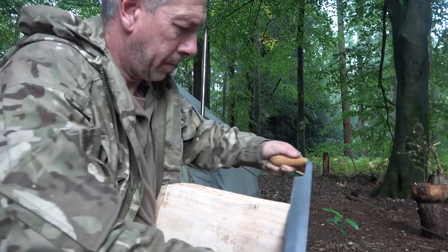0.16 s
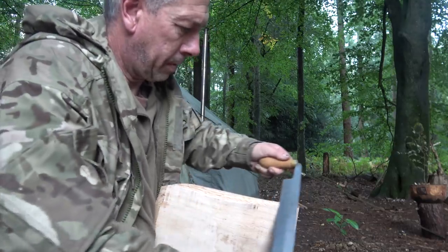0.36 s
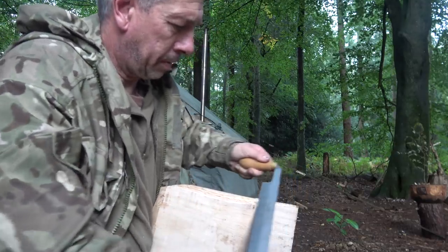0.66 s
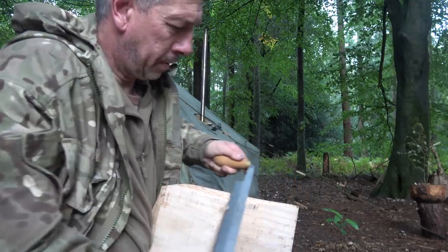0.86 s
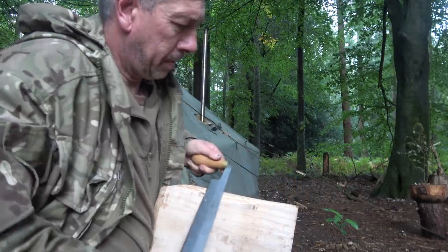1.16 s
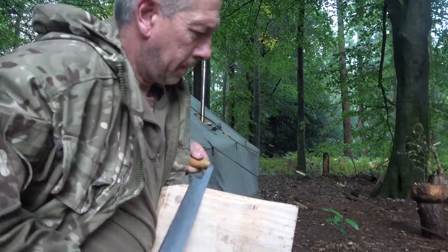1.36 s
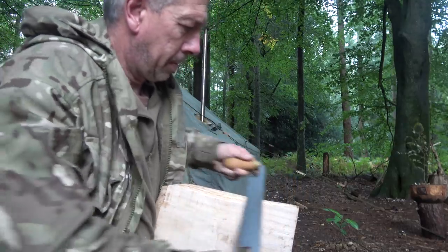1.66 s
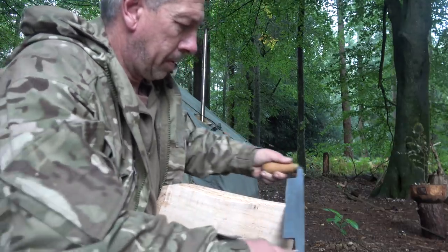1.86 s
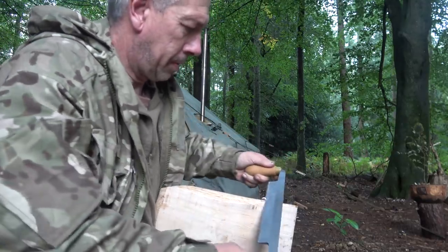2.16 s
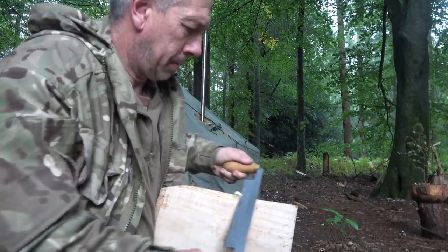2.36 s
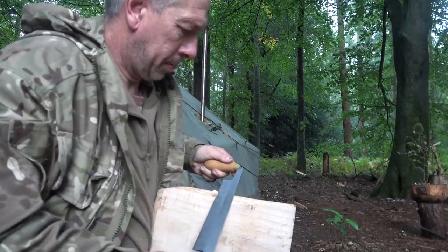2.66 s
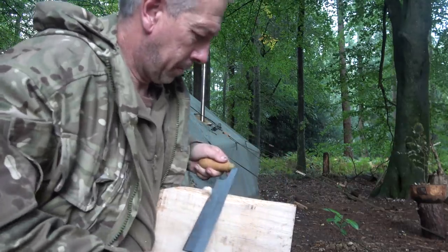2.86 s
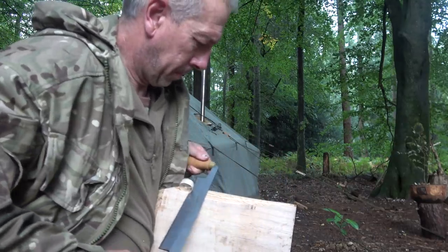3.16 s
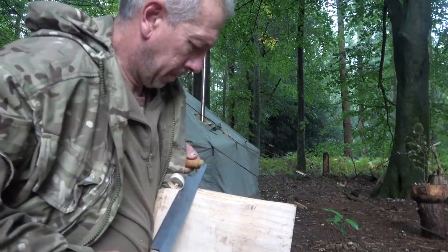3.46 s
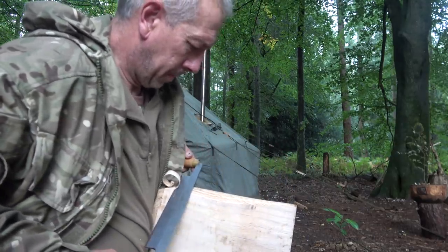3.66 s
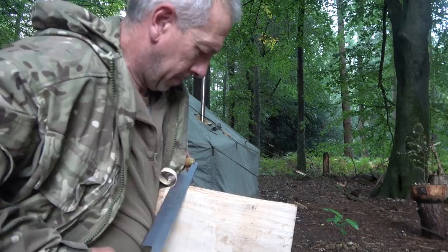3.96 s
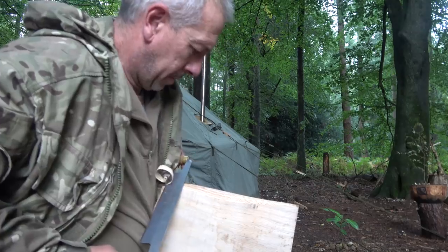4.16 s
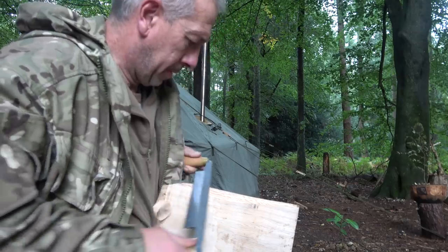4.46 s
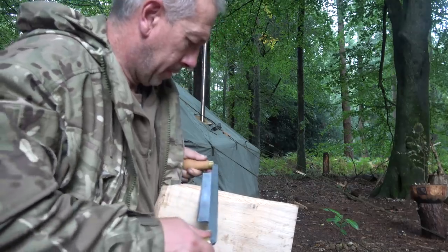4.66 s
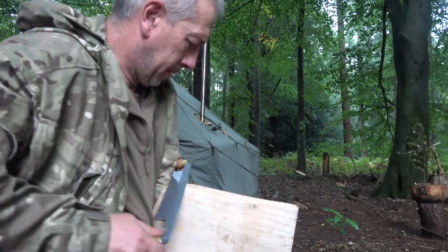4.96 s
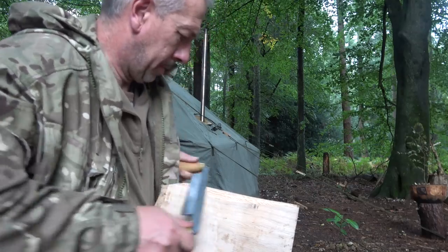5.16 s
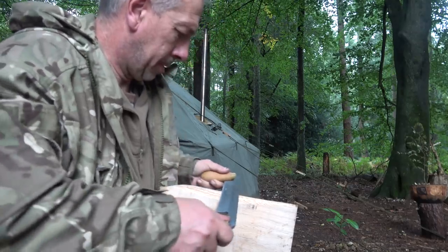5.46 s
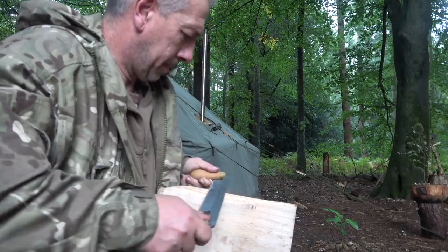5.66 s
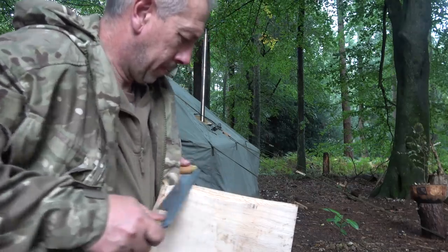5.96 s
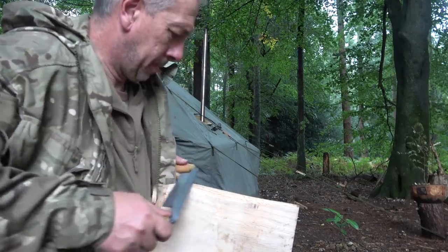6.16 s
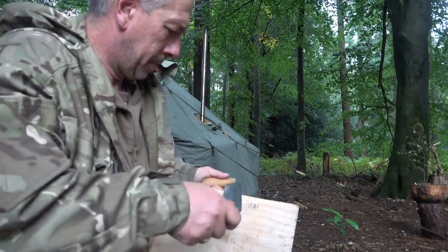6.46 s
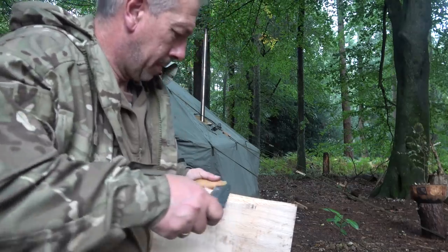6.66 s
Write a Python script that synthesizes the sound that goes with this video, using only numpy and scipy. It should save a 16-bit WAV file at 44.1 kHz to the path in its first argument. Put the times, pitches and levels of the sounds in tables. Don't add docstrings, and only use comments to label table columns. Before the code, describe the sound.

Dry tearing strokes of a steel blade on a wooden board edge, close and central, with faint short echoes off trunks and canvas. Scrapes rise and stop abruptly; snaps, small clicks and a single knock punctuate them. Midway the strokes thin into crackling shavings, then sharper slices and rubbing return. A breeze hisses in leaves; a bird whistles thinly.

```python
import sys
import numpy as np
from scipy import signal
from scipy.fft import rfft, irfft, next_fast_len
from scipy.io import wavfile
from scipy.ndimage import uniform_filter1d, map_coordinates

SR = 44100
rng = np.random.default_rng(int(sys.argv[2]) if len(sys.argv) > 2 else 0)


def inscribe(sig):
    pcm = np.round(np.clip(np.atleast_2d(sig).T, -1, 1) * 32767)
    wavfile.write(sys.argv[1], SR, pcm.astype(np.int16))


def boost_factor(decibels):
    exponent = np.asarray(decibels, float) / 20
    return 10 ** exponent


N = 299880

# centre_hz, width_hz, level_db
FLEX = [(341, 108, -6), (408.4, 89, -2), (465.7, 67.5, -2.5), (539, 37.4, -2)]
# centre_hz, width_hz, level_db
EDGE = [(778, 250, -9), (1078, 150, 2), (1212, 262, 0.5), (1336, 138, -0.5), (1430, 60, -34)]
# centre_hz, width_hz, level_db
LIFTED = [(1517, 42, -3), (2652, 53, -3), (3700, 100, -6.5), (5000, 200, -12), (5790, 62, -9),
          (6980, 270, -4.5), (7290, 150, -10), (9000, 400, -17)]
FADE_DB = 16


def unit(x):
    return x / np.sqrt(np.mean(x ** 2) + 1e-20)


def along(points, hz):
    f, v = np.transpose(points)
    return np.interp(np.log(hz + 1), np.log(f + 1), v)


def wobble(rate_hz):
    knots = rng.standard_normal(int(N * rate_hz / SR) + 4)
    return map_coordinates(knots, [np.arange(N) * rate_hz / SR])


def filtered(x, response):
    m = next_fast_len(N + SR // 2)
    return irfft(rfft(x, m) * response(np.fft.rfftfreq(m, 1 / SR)), m)[..., :N]


def body(modes):
    def response(f):
        total = 0
        for k, (centre, width, db) in enumerate(modes):
            damping = 1j * f * width
            total = total + (-1) ** k * boost_factor(db) * damping / (centre * centre - f * f + damping)
        return total
    return response


def driven(db, drive, response):
    return filtered(boost_factor(db) * drive, response) / np.std(filtered(drive, response))


def ring(hz, db, t60, attack):
    t = np.arange(SR // 2) / SR
    return boost_factor(db - 60 * t / t60) * np.sin(2 * np.pi * hz * t) * (1 - np.exp(-t / attack))


def add(track, s, sound):
    track[round(s * SR):][:len(sound)] += sound


def strokes():
    cutting, flat, askew = [(1490, 200, -14.5), (2186, 310, 4), (3910, 100, 0.5), (4580, 110, -4),
                            (5880, 120, 1), (6140, 70, -14), (7280, 60, -3), (8000, 150, -4),
                            (9200, 60, -22), (9850, 120, 0), (10000, 340, -4), (12230, 140, -1.5)], [(2076, 106, -9.5), (3446, 130, -5), (3584, 130, -2),
                                             (3676, 80, 1)], [(3030, 110, 0), (4493, 210, 4.5),
                                                           (4700, 230, 0.5), (4950, 200, -5), (5663, 54, 0),
                                                           (9350, 350, -11)]
    bench, air = [(119.7, 16.4, -1), (164, 103, -2.5)], [(12200, 5900, 0)]
    # frequency_hz, density_db (per Hz)
    fibre, fizz = [(820, -10), (1400, 7), (2760, 2), (3750, 2.5), (5550, 0.5), (6130, 3), (7700, -21.5),
                   (10000, -58), (16900, -120)], [(4710, -11), (8000, 2.5), (9330, -5), (10200, -7.5), (12300, -18),
                                  (15800, -22)]
    flex_db, edge_db, scrape_db, fizz_db, air_db, *rings_db = effort()
    tear = grainy(tearing(spread_db=3.0, chatter_db=0.95), depth_db=3.0, wide=3)
    push = tearing(spread_db=3, chatter_db=2.0)

    def narrow_board(f):
        return body(FLEX)(f) * f ** 2 / (f ** 2 + 260 ** 2) / (1 + 1j * (f / 640) ** 3)

    out = driven(flex_db, push, narrow_board)
    out += driven(edge_db, push + 0.4 * tear, body(EDGE))
    out += driven(edge_db - 16.0, tear, body(bench))
    out += driven(scrape_db - 4.0, tear, lambda f: boost_factor(along(fibre, f)))
    out += driven(fizz_db, tear, lambda f: boost_factor(along(fizz, f)))
    out += driven(air_db, tear, lambda f: body(air)(f) ** 2)
    rub = grainy(tearing(spread_db=3.5, chatter_db=1.5), depth_db=3.2, wide=7)
    holds = (cutting, flat, LIFTED, askew)
    in_cut, lying, touching, slanted = [driven(db, rub, body(modes)) for db, modes in zip(rings_db, holds)]
    return out + bent(in_cut + lying, scrape_db), bent(touching + slanted, scrape_db)


def effort():
    # hardest_s, rise_s, fall_s, scrape_db, push_db (on the board)
    cuts = [
        (0.714, 0.077, 0.17, -44.5, -9),
        (.988, 0.28, 0.12, -44, -4.5),
        (1.148, 0.26, 0.35, -47, -6),
        (1.29, 0.055, 0.11, -54, 2.5),
        (5.06, 0.089, 0.12, -53.5, -3),
    ]
    skims = [(.004, .05, 0.024, -45, 7), (0.031, 0.006, .012, -46, 2), (0.088, .03, 0.04, -47.5, -2),
             (1.76, 0.049, 0.088, -49, 1), (0.14, 0.025, 0.041, -55, 13), (2.31, 0.056, 0.11, -47, 0),
             (2.804, 0.0094, 0.012, -56.5, 12), (4.571, 0.19, 0.13, -47.5, 5),
             (5.24, 0.055, 0.18, -50.5, 6.5), (5.317, 0.052, 0.078, -44, 2), (6.41, 0.094, 0.077, -47, 4.5),
             (6.465, 0.11, 0.05, -46, 0), (6.375, 0.017, 0.016, -47.5, -6), (6.8, .03, .03, -55, 7),
             (6.53, 0.056, 0.037, -56, 2)]
    grazes = [
        (.13, 0.27, 0.16, -47.5, -3.5),
        (.46, 0.072, .1, -44, -14.5),
        (1.83, 0.042, 0.071, -51, -4),
        (2.141, 0.091, 0.1, -46, -3.5),
        (2.187, 0.061, 0.032, -40.5, -16),
        (2.45, 0.26, 0.25, -44, -12.5),
        (4.42, 0.078, 0.12, -49.5, -7.5),
        (.54, .05, 0.032, -51.5, -10),
    ]
    slices = [
        (2.57, 0.32, 0.057, -48.5, -5.5),
        (2.762, 0.045, 0.076, -46.5, -2.5),
        (4.75, 0.028, .06, -48.5, -0.5),
        (4.9, 0.19, 0.16, -45, -2),
        (5.005, 0.036, 0.041, -46.5, -2.5),
        (5.77, 0.093, 0.14, -47, -11),
        (5.83, 0.074, 0.095, -45, -3.5),
        (5.94, 0.048, 0.044, -42, 2),
        (5.985, 0.035, 0.021, -46, -5),
    ]
    curls = [(2.69, 0.03, 0.044, -62, 9.5), (3.0, 0.14, 0.08, -43, -5.5), (3.207, 0.18, 0.17, -48.5, -7),
             (3.42, 0.1, 0.06, -50.5, -3.5), (3.631, 0.12, 0.047, -50, -5.5), (3.668, .04, 0.028, -53, -9),
             (3.38, 0.023, 0.062, -54.5, -4), (2.8, .03, .025, -59, -2), (3.89, 0.057, 0.067, -54.5, -3),
             (5.87, 0.075, 0.08, -48, -16), (4.035, 0.025, 0.049, -48.5, -6),
             (4.085, 0.043, 0.057, -49, -8)]
    rubs = [
        (1.43, 0.27, 0.044, -49.5, -8),
        (1.63, .12, 0.22, -48.5, -12),
        (1.9, 0.19, 0.13, -52.5, -3.5),
        (6.03, 0.11, 0.13, -48.5, -7),
        (6.3, 0.16, .1, -55.5, 0.5),
        (6.535, .04, .04, -55, -4),
    ]
    drags = [
        (.25, 0.2, 0.073, -63.5, -16),
        (1.5, 0.066, .06, -83, -12),
        (4.18, 0.086, 0.11, -59.5, -4),
        (4.28, 0.11, 0.14, -72, -20),
        (5.15, 0.077, 0.15, -56, -7),
    ]
    sweeps = [
        (5.42, 0.095, 0.06, -51, 5),
        (5.6, 0.14, 0.13, -52.5, -6),
        (5.7, 0.084, 0.087, -52.5, -5),
        (6.66, 0.097, 0.14, -52.5, -4),
        (6.79, 0.12, .1, -50.5, -4),
    ]
    # cutting_db, flat_db, lifted_db, askew_db
    ring_rows = [
        (-4.5, -15, -19.5, -12.5),
        (-28, 0, -13, -11),
        (-18, -8, -5, -15.5),
        (-14.5, -8, -16, -6.5),
        (-7, -10.5, -11.5, -10),
        (-14.5, -36, -11, -21),
        (-28, -17, -2.5, -7),
        (-28, -9, -16, 0),
    ]
    # edge_db, fizz_db, air_db
    layer_rows = [
        (-5, -4, -23),
        (-3.5, -10, -32),
        (-7, -12.5, -26),
        (-3.5, -11, -26),
        (-2, -1.5, -13.5),
        (-1, -12, -38),
        (-4, -5, -33),
        (-4, -6, -36),
    ]
    rise_curve, fall_curve = 1.76, 2.1
    edge_follows, fizz_follows = 0.23, 0.033
    resting_db = -63.5
    lasts = np.array([0.86, 1.08, 1, 0.9, 0.9, 1, 1, 1, 1])[:, None]
    t, power = np.arange(0, N / SR + .01, .002), 1e-12
    holds = (cuts, skims, grazes, slices, curls, rubs, drags, sweeps)
    for bites, rings, (edge_db, fizz_db, air_db) in zip(holds, ring_rows, layer_rows):
        for s, rise, fall, db, push_db in bites:
            before = t < s
            away = np.abs(t - s) / np.maximum(np.where(before, rise, fall), .005) / lasts
            over = [push_db, edge_db + edge_follows * push_db, 0, fizz_db + fizz_follows * push_db, air_db, *rings]
            fade_db = FADE_DB * away ** np.where(before, rise_curve, fall_curve)
            power = power + boost_factor(2 * (db + np.array(over)[:, None] - fade_db))
    power[1] += boost_factor(2 * resting_db)
    return [np.interp(np.arange(N) / SR, t, 10 * np.log10(p)) for p in power]


def tearing(spread_db, chatter_db):
    size = boost_factor(spread_db * uniform_filter1d(rng.exponential(size=N), size=3))
    return unit(size * rng.standard_normal(N) * boost_factor(chatter_db * (wobble(35) + wobble(140))))


def grainy(x, depth_db, wide):
    z = signal.stft(x, nperseg=512)[2]
    field = uniform_filter1d(rng.standard_normal(z.shape), size=round(wide), axis=0)
    field = uniform_filter1d(field, size=22, axis=1)
    return unit(signal.istft(z * boost_factor(depth_db * unit(field)), nperseg=512)[1][:N])


def bent(x, press_db):
    bend_per_db = .0008
    press_db = np.clip(press_db, -62, -40)
    slow_db = uniform_filter1d(press_db, size=SR // 2)
    moment = np.arange(N) + np.cumsum(bend_per_db * (press_db - slow_db))
    return map_coordinates(x, [np.clip(moment, 0, N - 1)])


def snaps():
    # start_s, peak_db, knock_db (board), top_db (treble), length_s
    catches = [(0.028, -25, 7, -10.5, 0.012), (0.0336, -34, 6, -15.5, 0.008), (0.051, -26, 10, -15, 0.0074),
               (0.0545, -13, 1.5, -14, 0.005), (0.0725, -24, 7, -18, 0.013), (0.439, -24, -20, -5, 0.02),
               (0.672, -24, -16, -18, 0.016), (0.709, -20.5, -16, -8, 0.022),
               (2.12, -18.5, -22, -43, 0.026), (2.1826, -11, -26, -43, 0.0078),
               (2.303, -12, -10, -15, 0.018), (2.355, -15, -6, -11, 0.025), (2.385, -16.5, -25, -14, 0.021),
               (2.7481, -23, -20, -8, 0.013), (3.617, -38, 0, 5, 0.006), (4.026, -35.5, 0, 9, 0.018),
               (4.073, -28, 3, 2, 0.012), (4.734, -27, -8, -14, 0.017), (4.9855, -22, 0, -16, 0.011),
               (5.819, -22.5, -9, -4, 0.02), (5.927, -16, -2, 0, 0.005), (5.9418, -10, -3.5, -2, 0.0053),
               (6.375, -32, -1, -29, 0.012), (6.409, -25, 5.5, -30, 0.0084), (6.437, -34, -7.5, -20, 0.012),
               (6.4686, -28.5, 4, -18, 0.011), (0.986, -23, -6, -14, 0.015), (0.862, -23, -6, -12, 0.027),
               (1.308, -27, -8, -10, 0.011), (3.375, -30, 2, -15, .015), (6.339, -35, 7, -20, .01),
               (6.455, -25, 6, -19, 0.009), (6.483, -27, -3, -20, .008), (6.546, -29, 0, -15, .008)]
    builds, peaks = 0.7, 0.24
    crack, top, tap = np.zeros((3, N + SR))
    t, lead = np.arange(2000) / SR, .015
    noises = rng.standard_normal((len(catches), len(t)))
    for (s, db, knock_db, top_db, life), noise in zip(catches, noises):
        life = np.clip(life, .002, .04)
        late = (t - lead) / life - peaks
        burst = noise * boost_factor(-13 - 37.0 * np.where(late > 0, late, -late / builds))
        add(crack, s - lead, boost_factor(db) * burst)
        add(top, s - lead, boost_factor(db + top_db - 12.5 - 33 * np.abs(late - .1)) * noise)
        add(tap, s, boost_factor(db + knock_db + 5.5) * np.hanning(12))

    def band(f, lo_hz, hi_hz):
        return 1j * f / (lo_hz + 1j * f) / (1 + 1j * f / hi_hz) ** 2

    out = filtered(crack[:N], lambda f: band(f, 1300, 8000) / (1 + (f / 11000) ** 4) + 2.4 * body(LIFTED)(f))
    out = out + filtered(top[:N], lambda f: 3 * band(f, 8000, 11000) ** 2 / (1 + (f / 14000) ** 4))
    return out + filtered(tap[:N], body([*FLEX, *EDGE]))


def splinters():
    # start_s, peak_db, centre_hz, width_hz, t60_s
    breaks = [(.0551, -15.5, 9800, 4500, .009), (.0558, -16.5, 4500, 5000, .011),
              (.029, -36, 7000, 2000, .03), (3.6158, -29, 8500, 7000, .009), (4.014, -48, 9500, 5000, .08),
              (4.0352, -35, 10000, 5000, .01), (4.044, -35, 7000, 2500, .015),
              (4.0762, -23, 9500, 8000, .013), (4.081, -34, 2200, 2000, .02), (4.74, -39, 11000, 5000, .06),
              (4.9867, -26, 7500, 6000, .016), (5.0005, -29, 4300, 2200, .025),
              (4.9875, -31, 2400, 2000, .04), (2.3115, -33, 12000, 3000, .02),
              (2.508, -33, 4000, 2000, .04), (2.452, -35, 5000, 5000, .04), (1.7625, -29, 4000, 4000, .03),
              (3.238, -35, 6000, 4000, .015), (4.998, -33, 2200, 1500, .03), (.052, -27, 1500, 1000, .05)]
    side_db = -7
    out, t = np.zeros((2, N + SR)), np.arange(4096) / SR
    f = np.fft.rfftfreq(len(t), 1 / SR)
    noises = rng.standard_normal((len(breaks), 2, len(t)))
    for (s, db, hz, width_hz, t60), noise in zip(breaks, noises):
        response = body([(hz, width_hz, 0)])(f) ** 2 / (1 + (f / 13000) ** 8)
        mid, side = unit(irfft(rfft(noise) * response)) * boost_factor([[0], [side_db]])
        decay = boost_factor(db - 6 - 60 * t / t60) * (1 - np.exp(-t / .0003))
        add(out.T, s, (decay * [mid + side, mid - side]).T)
    return out[:, :N]


def ticks():
    # start_s, peak_db, pitch_hz, cycles
    clicks = [(3.9966, -35.5, 880, 2.8), (4.0328, -28, 1500, 1.2), (4.119, -26, 7000, 3),
              (4.1192, -30, 2500, 1.5), (4.124, -36, 2500, 1.3), (4.1375, -34, 2300, 1.5),
              (4.2315, -34, 1800, 1.5), (4.138, -30, 4500, 1.1), (4.1651, -28, 1910, 2.1),
              (4.171, -31, 7160, 4.7), (4.178, -29, 2400, 1.6), (4.1782, -34, 6500, 2.5),
              (4.191, -36, 1200, 2), (4.103, -38, 2800, 2), (4.146, -40, 2200, 2), (4.155, -41, 3200, 2),
              (4.186, -39, 2600, 2), (4.207, -42, 2000, 2), (4.2318, -30, 6500, 2.6),
              (4.988, -27.5, 1300, 11), (0.028, -38.5, 1010, 1.1), (0.0567, -24.5, 2190, 10),
              (0.0724, -34, 510, 2.3), (4.741, -34, 5870, 8), (5.769, -24, 3000, 1), (5.9298, -17, 6400, 3),
              (5.9437, -13, 5500, 2.5), (5.958, -28, 8500, 4), (4.109, -38, 3000, 1.5),
              (4.407, -32, 1800, 1.5), (6.4098, -27, 1500, 1.5), (6.566, -35, 1200, 2.7),
              (3.893, -38, 5500, 1.5), (5.72, -34, 2500, 1.5), (1.42, -36, 3000, 1.2)]
    out = np.zeros(N + SR)
    for s, db, hz, cycles in clicks:
        add(out, s, ring(hz, db, 3 * cycles / hz, attack=.12 / hz))
    return out[:N]


def knocks():
    # pitch_hz, level_db, t60_s
    blow = [(530, -1, 0.05), (405, 6.5, 0.021), (313, -2.5, 0.023), (1200, 3, 0.02), (1760, -14.5, 0.036),
            (1310, -12.5, 0.071), (100, -34, 0.23), (2690, -24, 0.04), (3780, -26, 0.05),
            (4530, -17, 0.014), (5820, -18, 0.014), (7050, -12, 0.01)]
    # start_s, pitch_hz, level_db, t60_s
    thuds = [
        (5.83, 114, -40.5, 0.2),
        (5.96, 120, -34, 0.062),
        (3.8, 960, -52, 0.042),
        (7.2, 520, -27, 0.034),
        (4.08, 128, -35, 0.056),
    ]
    # start_s, pitch_hz, level_db, t60_s
    bounces = [(.001, 430, -29, 0.027), (0.0292, 400, -18, .022), (.0278, 1050, -22, .018),
               (0.0347, 400, -25, .03), (.0495, 470, -26, .025), (.0725, 440, -27, .03),
               (.128, 400, -31, 0.057), (5.927, 477, -30, 0.054), (6.465, 417, -30.5, .04),
               (.066, 3700, -36, .1), (1.7825, 480, -29, .025), (1.789, 3700, -39, .09),
               (1.799, 2700, -42, .06), (1.7995, 500, -34, .03), (4.995, 1150, -30, .04),
               (4.08, 1000, -33, .025), (.716, 480, -38, .03), (.862, 420, -38, .03),
               (1.059, 330, -37, .04), (1.292, 400, -39, .06), (2.507, 480, -39, .04),
               (3.614, 500, -41, .03), (4.123, 480, -46, .02), (4.163, 500, -42, .02)]
    knock_s, knock_db = 1.7628, -14
    out = np.zeros(N + SR)
    for k, (hz, db, t60) in enumerate(blow):
        add(out, knock_s, boost_factor(knock_db) * (-1) ** k * ring(hz, db, t60, attack=0.0017))
    woody = uniform_filter1d(rng.standard_normal(900), size=4) * boost_factor(-60 * np.arange(900) / SR / 0.015)
    add(out, knock_s, boost_factor(knock_db - 13.5) * woody)
    for s, hz, db, t60 in thuds:
        add(out, s, ring(hz, db, t60, attack=0.018))
    for s, hz, db, t60 in bounces:
        add(out, s, ring(hz, db, t60, attack=0.0014))
    return out[:N]


def rustle():
    # hardest_s, rise_s, fall_s, level_db
    brushes = [
        (.2, 0.084, .1, -67),
        (.36, .1, 0.076, -60),
        (.6, .05, 0.067, -61.5),
        (1.5, 0.083, 0.066, -61.5),
        (4.14, .05, 0.13, -58),
        (4.24, .06, .06, -60.5),
        (4.32, .06, .08, -63),
        (4.42, 0.071, .06, -59),
        (6.06, .06, 0.068, -62.5),
    ]
    # centre_hz, width_hz, level_db
    whisper = [(7150, 1000, 0), (5800, 560, -3), (2600, 900, -7)]
    t, power = np.arange(N) / SR, 1e-12
    for s, rise, fall, db in brushes:
        away = (t - s) / np.where(t < s, rise, fall)
        power = power + boost_factor(2 * (db - FADE_DB * away ** 2))
    friction = tearing(spread_db=3.0, chatter_db=1.9)
    return driven(10 * np.log10(power), friction, lambda f: body(whisper)(f) ** 2 / (1 + (f / 8800) ** 8))


def bird():
    # start_s, length_s, from_hz, to_hz, level_db
    calls = [
        (1.998, 0.062, 4700, 4870, -61),
        (2.82, 0.12, 4740, 4770, -62),
        (5.047, 0.0746, 4800, 4940, -70),
        (6.24, 0.085, 4700, 4800, -65),
    ]
    out = np.zeros(N + SR)
    for s, length, from_hz, to_hz, db in calls:
        n = round(length * SR)
        phase = 2 * np.pi * np.cumsum(np.linspace(from_hz, to_hz, n)) / SR
        add(out, s, boost_factor(db) * np.hanning(n) ** 0.29 * np.sin(phase))
    return out[:N]


def trees(x):
    # frequency_hz, t60_s
    decay = [(200, 0.16), (2000, 0.15), (10000, 0.027)]
    hz, t, z = signal.stft(rng.standard_normal((2, SR // 2)), SR, nperseg=256)
    tail = signal.istft(z * boost_factor(-60 * t / along(decay, hz)[:, None]), SR, nperseg=256)[1]
    return signal.fftconvolve(np.pad(x, (60, 0))[None], tail / np.linalg.norm(tail[0]), axes=1)[:, :N]


def background():
    # frequency_hz, density_db (per Hz)
    spectrum = [(12, -31), (20, -9.5), (85, -16), (345, -18), (419, -8.5), (482, -20), (554, -11),
                (1200, -17), (1950, -18), (2570, -21), (4140, -20), (10500, -24.5), (15800, -28.5)]
    # frequency_hz, correlation
    alike = [(30, 0.052), (150, 0.16), (500, 0.44), (1500, 0.17), (5000, 0.2), (12000, -.08)]
    # time_s, hiss_db (over its mean)
    hiss_levels = [(0, 3), (.33, -2.5), (.6, -5), (1.2, 2.5), (1.5, -0.5), (2.0, 0.5), (3.0, 0), (3.7, -5.5),
                   (4.0, -5), (4.3, -4), (4.8, 2), (5.6, 1), (6.15, -1), (6.8, 1.5)]
    level_db, hiss_from_hz = -53, 1400

    def mid_side(hz):
        turn = np.arccos(np.clip(along(alike, hz), -1, 1)) / 2
        return boost_factor(along(spectrum, hz)) * [np.cos(turn), np.sin(turn)]

    mid, side = filtered(rng.standard_normal((2, N)), mid_side)
    wood = unit(np.array([mid + side, mid - side]))
    hum = filtered(wood, lambda hz: 1 / (1 + (hz / hiss_from_hz) ** 4))
    hiss_gain = boost_factor(np.interp(np.arange(N) / SR, *np.transpose(hiss_levels)))
    return boost_factor(level_db + 1.5 * wobble(1.0)) * (hum + hiss_gain * (wood - hum))


def scene():
    (wood, free), call = strokes(), bird()
    hits = snaps() + ticks() + knocks()
    free = free + rustle()
    work = wood + free + hits
    sideways = [(200, -25), (1500, -20), (5000, -8.5), (12000, 2)]  # frequency_hz, level_db
    scattered = filtered(work + .6 * free + .4 * hits, lambda f: boost_factor(along(sideways, f)))
    return work * boost_factor([[-.12], [.12]]) + call + trees(scattered + call) + background() + splinters()


def narrowed(x, under_db, doubt_db):
    z = signal.stft([x[0] + x[1], x[0] - x[1]], nperseg=2048)[2]
    band = np.arange(z.shape[1]) // 26
    mid, side = np.add.reduceat(np.abs(z) ** 2, np.unique(band) * 26, axis=1) + 1e-20
    share_db = 10 * np.log10(side / mid)
    share_db = share_db - np.median(share_db, axis=1)[:, None]
    limit_db = under_db + doubt_db * rng.standard_normal(mid.shape)
    keep = share_db + 2 * share_db[1:27].mean(0) > 2 * limit_db
    keep[0] = True
    widen = boost_factor(np.interp(band, [3, 14], [0, 3]))[:, None]
    width = signal.istft(z[1] * keep[band] * widen, nperseg=2048)[1][:N]
    return (x[0] + x[1] + np.array([width, -width])) / 2


def low_pass(x):
    return signal.sosfilt(signal.butter(12, 16510, fs=SR, output="sos"), x)


def record(dry):
    top_hz = 15760
    sound = narrowed(filtered(dry, lambda hz: hz < top_hz), under_db=-1.2, doubt_db=2.0)
    return low_pass(sound)


dry = scene()
out = record(dry)
inscribe(out)
```